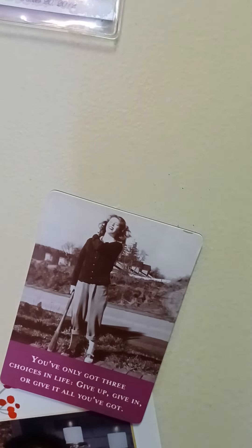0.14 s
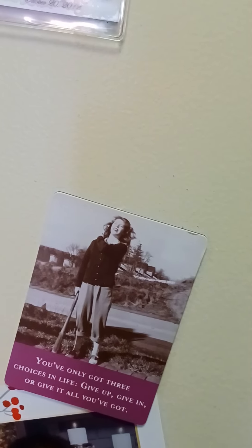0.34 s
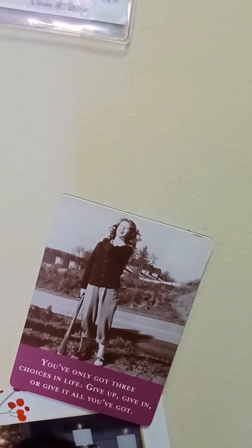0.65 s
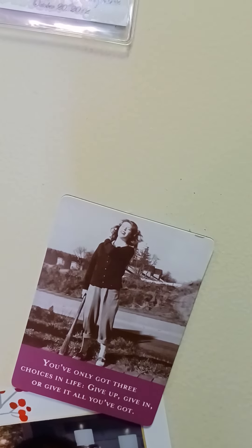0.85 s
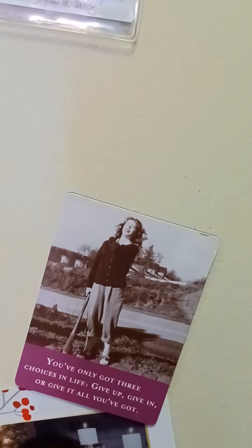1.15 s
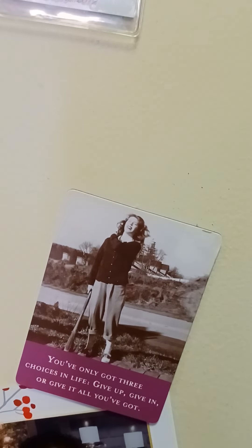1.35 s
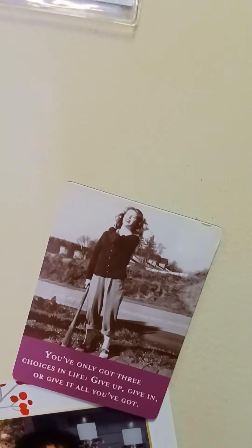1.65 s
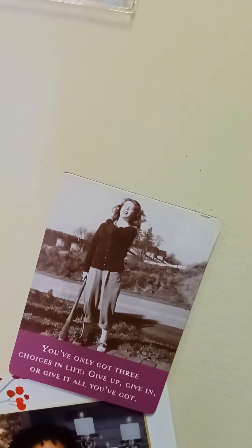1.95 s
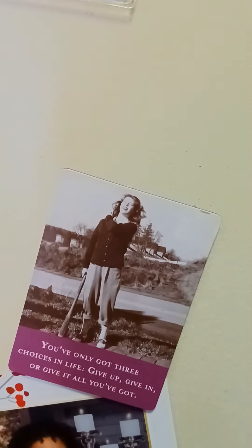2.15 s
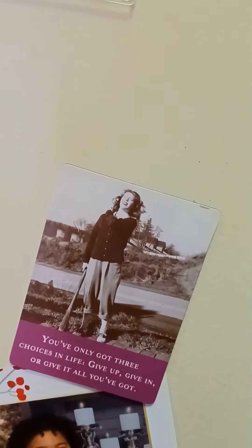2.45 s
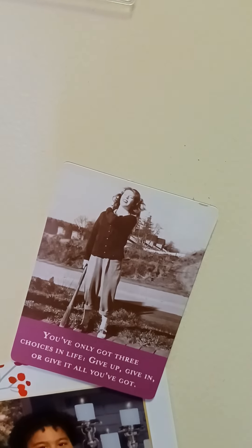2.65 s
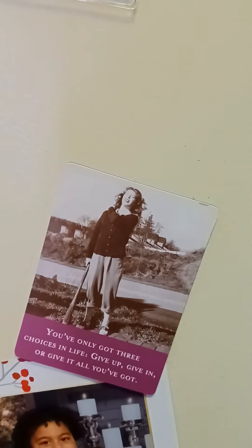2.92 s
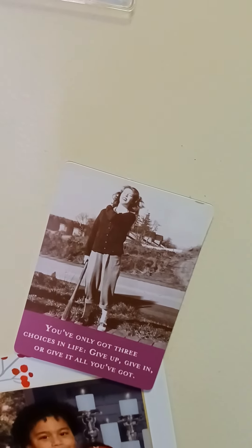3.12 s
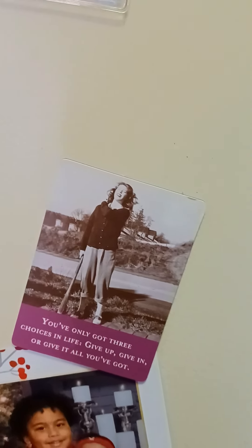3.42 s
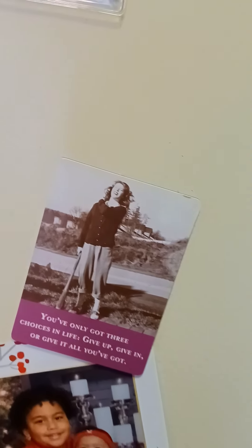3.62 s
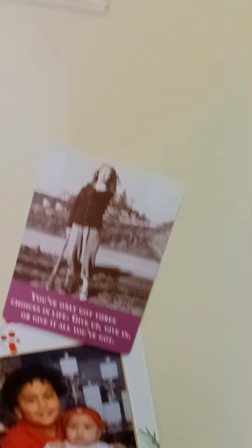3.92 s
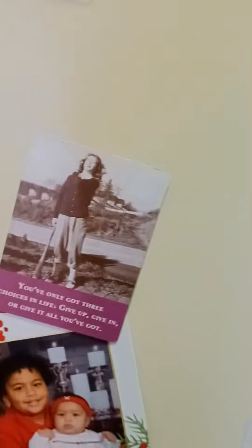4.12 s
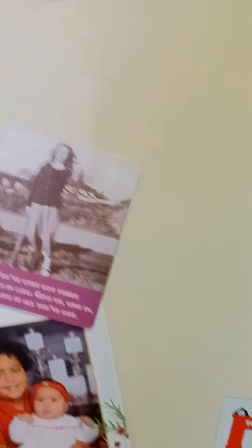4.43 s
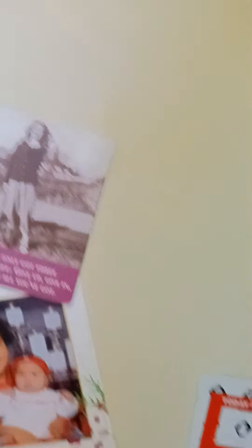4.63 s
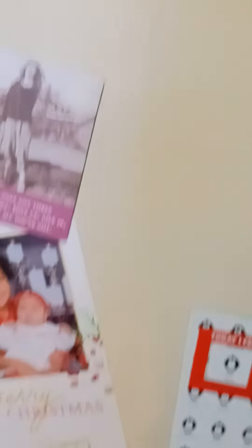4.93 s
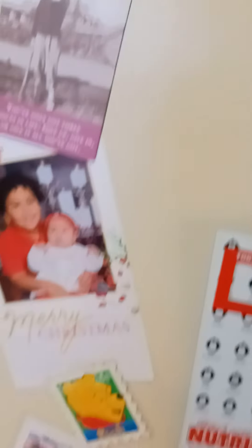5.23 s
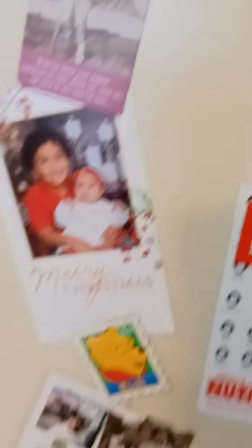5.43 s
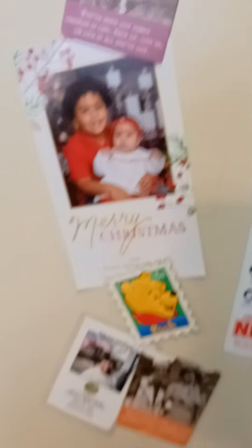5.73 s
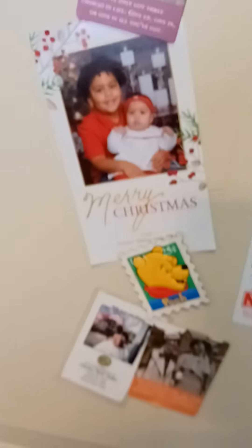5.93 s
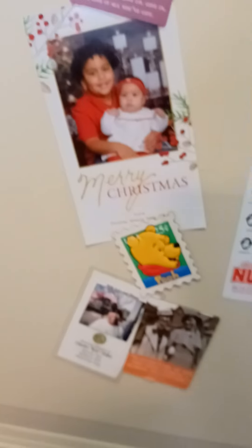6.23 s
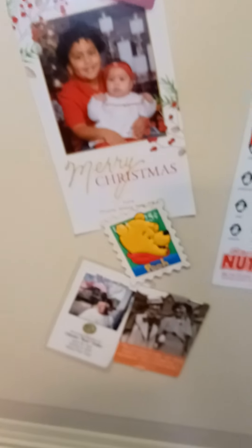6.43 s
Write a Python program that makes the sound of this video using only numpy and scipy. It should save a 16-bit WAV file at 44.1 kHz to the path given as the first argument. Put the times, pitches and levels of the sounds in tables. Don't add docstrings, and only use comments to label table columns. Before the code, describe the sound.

A refrigerator fan hums low and wavers in a quiet kitchen, then cloth rustles and nearby soles scuff, squeak and step before the hum continues alone.

```python
import sys
import numpy as np
from scipy import signal
from scipy.fft import rfft, irfft
from scipy.io import wavfile
from scipy.ndimage import map_coordinates

SR = 44100
rng = np.random.default_rng(int(sys.argv[2]) if len(sys.argv) > 2 else 0)


def digitize_waveform(pressure):
    field = np.atleast_2d(pressure).T
    bounded = np.clip(field, -1, 1)
    quanta = np.round(bounded * 32767).astype(np.int16)
    wavfile.write(sys.argv[1], SR, quanta)


def rack_gain(trim_db):
    fader = np.asarray(trim_db, float)
    return 10 ** (fader / 20)


N = 289737
SHAFT_HZ = 12.095
IN_STEP_S = 1.25

# centre in seconds, change in dB, half-length in seconds.
GUSTS = [(0.203, -2, 0.3), (0.496, 3.0, 0.033), (0.801, 2, 0.052), (0.854, -4, 0.047), (1.098, 2.5, 0.053),
         (1.419, 2, 0.023), (1.629, -2.5, 0.025), (1.772, 3.5, 0.071), (2.02, -6.5, 0.039),
         (2.221, 2.5, 0.082), (2.521, -14.5, 0.052), (2.659, -3.5, 0.047), (3.191, 2, 0.063),
         (3.333, -2, 0.081), (3.696, -3.5, 0.025), (3.996, -3, 0.019), (4.364, 2, 0.118),
         (4.566, -8.5, 0.044), (4.714, 2.2, 0.025), (4.924, 3, 0.088), (5.09, -4, 0.1),
         (5.221, -5.5, 0.033), (5.585, 4, 0.026), (5.852, -6, 0.074), (6.053, -6.5, 0.063), (6.7, 2, 0.26)]


def at_hz(points, hz):
    points_hz, points_db = np.transpose(points)
    return np.interp(np.log(hz), np.log(points_hz), points_db)


def rms_one(x):
    return x / np.sqrt(np.mean(x ** 2) + 1e-20)


def drift(rate_hz):
    knots = rng.standard_normal(400)
    place = np.arange(N // 64 + 2) * 64 / SR * rate_hz % 390
    slow = map_coordinates(knots, [place], order=3)
    return np.interp(np.arange(N) / 64, np.arange(len(slow)), slow)


def swells(rows):
    t = np.arange(0, N, 64) / SR
    total_db = sum(db * np.exp(-((t - s) / length_s) ** 2) for s, db, length_s in rows)
    return np.interp(np.arange(N) / SR, t, total_db)


def pan(lean_db):
    return rack_gain(np.array([lean_db / 2, -lean_db / 2])).reshape(2, -1)


def band(x, low_hz, high_hz, order=2):
    return signal.sosfilt(signal.butter(order, [low_hz, high_hz], "band", fs=SR, output="sos"), x)


def colour(pair, spectrum, peaks=(), likeness=None):
    hz = np.maximum(np.arange(N // 2 + 1) * SR / N, 1)
    db = at_hz(spectrum, hz)
    for peak_hz, width_hz, peak_db in peaks:
        db = db + peak_db / (1 + (2 * (hz - peak_hz) / width_hz) ** 2)
    a, b = rfft(pair) * rack_gain(db)
    alike = 0 if likeness is None else np.clip(at_hz(likeness, hz), -1, 1)
    mid = np.sqrt(1 + alike) * a
    side = np.sqrt(1 - alike) * b
    return irfft(np.array([mid + side, mid - side]), N)


def tone(turns, db, lean_db, flutter_db, lag_rad=0.083):
    wave = np.cos(2 * np.pi * turns + lag_rad * np.array([[1], [-1]]))
    return np.sqrt(2) * rack_gain(db + flutter_db * drift(5)) * pan(lean_db) * wave


def fan_blades():
    # time in seconds, pitch in Hz.
    pitch = [(0, 133.12), (3.2, 133.12), (3.5, 132.85), (5.4, 132.85), (5.7, 133.05), (6.57, 133.05)]
    # centre in seconds, change in dB.
    chokes = [
        (.39, -2),
        (3.27, -4),
        (5.035, -1.5),
        (5.38, -1.5),
        (5.875, -7),
        (6.31, -3),
        (6.5, -6.5),
    ]
    choke_s, wobble_db, wobble_s = 0.018, 0.65, 0.0083
    s, hz = np.transpose(pitch)
    t = np.arange(N) / SR
    db = -37.5 + swells(GUSTS) + swells([(at_s, change_db, choke_s) for at_s, change_db in chokes])
    db += wobble_db * np.cos(2 * np.pi * SHAFT_HZ * (t - IN_STEP_S - wobble_s))
    turns = .23 + np.cumsum(np.interp(t, s, hz)) / SR
    return tone(turns, db, -.8, flutter_db=0.1, lag_rad=.12)


def motors():
    # multiple of the shaft rate, rms in dB, left minus right in dB.
    shaft_orders = [(6.03, -64.5, 0.5), (8.016, -60.5, -1.5), (20.28, -76, -3), (21.85, -77.5, 2),
                    (24.22, -73, 2.5), (32.32, -77, 0)]
    # multiple of the pump rate, rms in dB, left minus right in dB.
    pump_orders = [(1, -76.5, -2.6), (2, -74, 3), (3, -70, -2), (6, -80, 0.9)]
    # centre in seconds, rise in dB, half-length in seconds.
    whine_swells = [
        (2.3, 10.5, 0.11),
        (3.3, 10, .3),
        (4.4, 11, .06),
        (5.32, 17, 0.15),
        (6.35, 5.5, 0.28),
    ]
    motor_hz, whine_hz, pump_hz = 93.76, 1308, 53.2
    t = np.arange(N) / SR - IN_STEP_S
    out = tone(motor_hz * t, -62, .8, flutter_db=.6, lag_rad=.02)
    out += tone(whine_hz * t, -96 + swells(whine_swells), -3, flutter_db=1.5, lag_rad=.5)
    for k, db, lean_db in shaft_orders:
        out += tone(k * SHAFT_HZ * t, db, lean_db, flutter_db=2.0, lag_rad=0.15)
    for k, db, lean_db in pump_orders:
        out += tone(k * pump_hz * t, db, lean_db, flutter_db=2.0)
    return out


def scuffs():
    # frequency in Hz, density in dB per Hz.
    sole = [(410, -45), (700, -2), (767, -8.5), (1010, -11), (1930, -2.5), (2370, -8), (2960, -5),
            (4040, -7), (5300, -7), (7430, -3.5), (9020, -8.5), (13300, -10), (15600, -15)]
    # centre in Hz, width in Hz, height in dB.
    port = [(3500, 2000, 6.5), (5000, 700, 3), (7480, 1600, 3.5), (14500, 4400, 5.5)]
    # peak in seconds, peak in dB, rise and fall in seconds per 20 dB,
    # weight on the sole in dB.
    slides = [(3.834, -82, 0.2, 0.2, -0.5), (4.284, -55, 0.0467, 0.06, 0), (4.35, -77.5, 0, .1, 5.5),
              (4.695, -69, 0.02, 0.06, -7), (5.0, -73, -0.37, 0.12, 0), (5.158, -59, 0.124, 0.0634, 1.5),
              (5.183, -57, .02, .05, -0.5), (5.395, -65.5, 0.01, 0.07, -2.5), (5.435, -57.5, .05, .05, -24),
              (5.461, -48, 0.0514, 0.0727, -8), (5.571, -75, .05, 0, 7), (5.362, -76.5, -0.16, -0.12, 2),
              (5.6, -81, 0.2, 0.02, 4)]
    # as the slides, but cloth hiss in dB last.
    rustles = [(3.645, -93, -0.04, 0.4, 8), (3.92, -72.5, 0.09, 0.12, 4), (3.97, -79, 0.15, -0.14, 5),
               (4.264, -62, 0.0347, 0.0268, 4), (4.418, -77, 0.08, 0.09, 4), (4.536, -91, 0.3, 0.4, 7.5),
               (4.697, -69.5, -0.0051, 0.0656, 10.5), (4.745, -76.5, 0, 0.12, -1),
               (4.92, -95, 0.6, 1.4, 11), (5.06, -75, 0.13, 0.22, 4), (5.41, -67.5, 0.02, 0.08, 8.5),
               (5.172, -65, 0.1347, 0.0567, -3), (5.455, -61, 0.0438, .06, 8)]
    slide_cloth_db, slide_grit_db = -3, -9
    rustle_weight_db, rustle_grit_db, grit_per_cloth = -2, 3, -0.23
    lean_db = -4

    size_db = 2.0 * np.minimum(rng.exponential(1, (2, N)), 4)
    grains = rng.standard_normal((2, N)) * rack_gain(size_db)
    rub = colour(grains, sole, port)
    edges_hz = [(1550, 2570), (2600, 4600), (4600, 9300), (9000, 16000)]
    layers = np.array([rms_one(band(rub, low, high, order=3)) for low, high in edges_hz])
    layers[3] *= pan(-6)

    strokes = []
    for *shape, weight_db in slides:
        strokes.append((shape, [weight_db, 0, slide_cloth_db, slide_grit_db]))
    for *shape, cloth_db in rustles:
        grit_db = rustle_grit_db + grit_per_cloth * cloth_db
        strokes.append((shape, [rustle_weight_db, 0, cloth_db, grit_db]))
    power = 0
    for shape, layer_db in strokes:
        gains = rack_gain(np.array(layer_db))[:, None, None] * pan(lean_db)
        power = power + gains ** 2 * stroke(*shape)
    envelope = np.repeat(np.sqrt(power), 32, axis=2)[..., :N]
    return rack_gain(3) * np.sum(layers * envelope, axis=0)


def stroke(peak_s, peak_db, rise_s, fall_s):
    blunt = 0.085
    late_s = np.arange(0, N, 32) / SR - peak_s
    away = np.maximum(-late_s / max(rise_s, .004), late_s / max(fall_s, .004))
    return rack_gain(2 * peak_db - 40 * (np.hypot(away, blunt) - blunt))


def ticks():
    # start in seconds, peak in dB, pitch in Hz, t60 in seconds.
    sole_ticks = [(3.6263, -75, 6560, 0.05), (3.6391, -72, 6020, 0.046), (3.657, -68.5, 7330, 0.05),
                  (3.673, -64, 7500, 0.05), (3.6785, -67.5, 6230, 0.05), (3.7523, -70.5, 7300, 0.05),
                  (3.789, -72.5, 7790, 0.05), (3.8066, -67.5, 7650, 0.042), (3.8382, -64.5, 7420, 0.046),
                  (3.8572, -66.5, 7350, 0.05), (3.879, -60.5, 7330, 0.05), (4.531, -69.5, 7300, 0.044),
                  (4.565, -67, 6710, 0.061), (4.6105, -71, 7400, 0.046), (4.6913, -50, 7200, 0.05)]
    fine_grit = [
        (4.4042, -61, 12100, 0.04),
        (4.7446, -57.5, 11950, 0.037),
        (5.08, -58, 11000, .02),
        (5.1835, -48, 12000, .015),
    ]
    heels = [
        (4.2805, -42.5, 2930, 0.028),
        (5.002, -61, 3100, 0.03),
        (5.1819, -37.5, 3280, 0.011),
        (5.36, -61.5, 3600, 0.03),
    ]
    out = np.zeros((2, N))
    t = np.arange(SR // 5) / SR
    for s, db, hz, t60_s in sole_ticks + fine_grit + heels:
        snap = np.sin(2 * np.pi * hz * t) * rack_gain(-60 * t / 0.0087)
        snap *= np.minimum(t * hz / 1.1, 1)
        trail = band(rng.standard_normal((2, len(t))), 0.63 * hz, min(1.7 * hz, 15500))
        trail *= rack_gain(-60 * t / max(t60_s, .004))
        at = round(s * SR)
        out[:, at:at + len(t)] += rack_gain(db) * pan(-4.5) * (snap + 1.1 * trail)
    return out


def thuds():
    # centre in seconds, level in dB, pitch in Hz, length in seconds, left minus right in dB.
    footfalls = [
        (4.292, -61, 1330, 0.039, -5),
        (4.3, -66, 760, 0.065, -1),
        (4.582, -77, 1540, 0.13, -7),
        (4.718, -75, 1620, 0.035, -11.5),
        (4.199, -59, 230, 0.08, 0),
        (4.864, -67, 567, 0.065, 6),
        (5.381, -72, 1940, 0.02, -10),
        (5.48, -67, 1120, 0.092, -3.5),
        (5.686, -69.5, 670, 0.044, 7.5),
    ]
    return narrow_bursts(footfalls)


def further_bursts():
    # centre in seconds, level in dB, pitch in Hz, length in seconds, left minus right in dB.
    bursts = [(3.67, -82.5, 6800, .04, -5), (3.8, -85, 6800, .08, -4), (4.29, -71, 1020, .04, -1),
              (4.568, -83, 6500, .05, -2), (4.74, -60, 185, .09, 0), (4.93, -84, 6800, .1, -3.5),
              (5.149, -67, 1800, .04, -5), (5.388, -73, 3300, 0.024, -3), (5.445, -55.5, 3900, 0.018, -3),
              (5.47, -62, 5300, .03, -3), (5.749, -73.5, 720, 0.13, 0.5)]
    return narrow_bursts(bursts)


def narrow_bursts(rows):
    out = np.zeros((2, N))
    t = np.arange(N) / SR
    for s, db, hz, length_s, lean_db in rows:
        near = slice(round((s - .3) * SR), round((s + .3) * SR))
        noise = rng.standard_normal((2, len(t[near])))
        board = rms_one(band(noise, 0.88 * hz, 1.18 * hz))
        out[:, near] += rack_gain(db) * np.exp(-((t[near] - s) / length_s) ** 2) * pan(lean_db) * board
    return out


def hollow(x):
    s, length_s, low_hz, high_hz = (5.397, .042, 2220, 3000)
    sos = signal.butter(4, [low_hz, high_hz], "band", fs=SR, output="sos")
    echo = signal.sosfiltfilt(sos, x)
    return x - np.exp(-((np.arange(N) / SR - s) / length_s) ** 4) * echo


def air():
    # frequency in Hz, density in dB per Hz.
    rush_spectrum = [(25, -49.5), (40, -27.5), (55, -14.5), (90, -9), (110, -11.5), (165, -7), (190, -15.5),
                     (250, -6.5), (400, -15.5), (600, -25), (1000, -33), (2000, -42), (4000, -54),
                     (6000, -59.5)]
    # centre in Hz, width in Hz, height in dB.
    cabinet = [(128.5, 31, 13), (223, 15, 6.5), (477, 13, 5), (709, 11, 7.5), (916, 21, 6)]
    # frequency in Hz, left-right likeness from -1 to 1.
    likeness = [(60, 0.31), (130, 0.98), (290, 0.66), (640, 0.27), (1410, -0.17), (3100, -0.23),
                (6820, -0.74), (15000, -0.23)]
    # centre in seconds, rise in dB, half-length in seconds.
    draughts = [
        (1.5, 0.5, .5),
        (4.78, 3.5, 0.16),
        (5.5, 1.5, .12),
    ]
    rush = colour(rng.standard_normal((2, N)), rush_spectrum, cabinet, likeness)
    rush = rush / np.std(band(rush, 180, 700))
    return rack_gain(-56 + 0.22 * swells(GUSTS) + swells(draughts)) * rush


def hand_rumble():
    # centre in seconds, rise in dB, half-length in seconds.
    shifts = [
        (1.0, 7, 0.14),
        (1.92, 10, .12),
        (2.75, 6.5, .08),
        (3.85, 17, 0.46),
        (4.75, 14, .2),
        (5.55, 8, 0.075),
        (6.5, 9, .1),
    ]
    shake = band(rng.standard_normal((2, N)), 42, 60, order=3)
    return rack_gain(-82.5 + swells(shifts)) * rms_one(shake[0] + 0.92 * shake)


def capsule_hiss():
    # frequency in Hz, density in dB per Hz.
    hiss_spectrum = [(1470, -31.5), (2500, -1.5), (2660, -9.5), (3170, -6), (4140, -12), (5050, -9),
                     (6070, -15.5), (8250, -10), (9390, -15.5), (13000, -8), (15600, -12)]
    hiss = rms_one(colour(rng.standard_normal((2, N)), hiss_spectrum))
    return rack_gain(-81.5 + .2 * swells(GUSTS)) * hiss


def buzz():
    # frequency in Hz, harmonic rms in dB.
    harmonics = [(2000, -118), (4500, -115), (6000, -119), (8200, -116), (9500, -123), (15000, -126)]
    mains_hz = 60.02
    bins = np.round(np.arange(34, 250) * mains_hz * N / SR).astype(int)
    strength = rack_gain(at_hz(harmonics, bins * SR / N) + 4.2 * rng.standard_normal(len(bins)))
    lines = np.zeros((2, N // 2 + 1), complex)
    lines[:, bins] = strength * np.exp(2j * np.pi * rng.random((2, len(bins))))
    return irfft(lines, N) * N / np.sqrt(2)


def scene():
    steps = hollow(scuffs() + ticks() + thuds() + further_bursts())
    return fan_blades() + motors() + steps + air() + hand_rumble()


def low_pass(x):
    return signal.sosfilt(signal.butter(12, 15710, fs=SR, output="sos"), x)


def record(dry):
    heard = dry + capsule_hiss() + buzz()
    top_hz = 15800
    mix = signal.sosfilt(signal.ellip(10, .3, 50, top_hz, fs=SR, output="sos"), heard)
    return low_pass(mix)


dry = scene()
out = record(dry)
digitize_waveform(out)
```